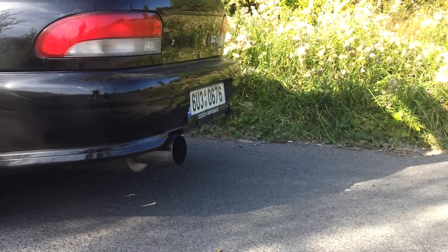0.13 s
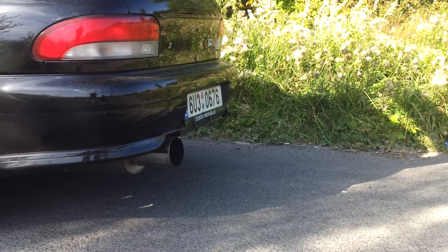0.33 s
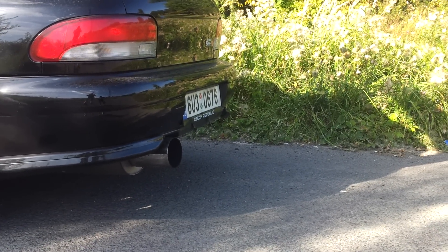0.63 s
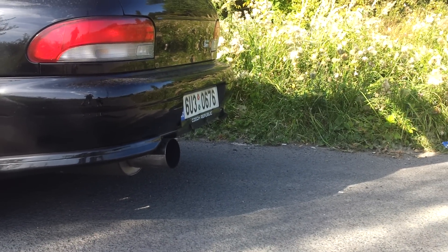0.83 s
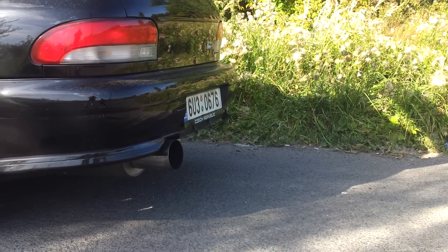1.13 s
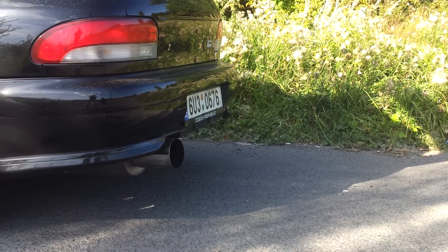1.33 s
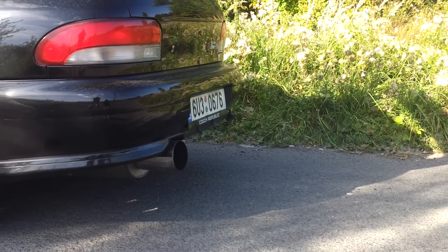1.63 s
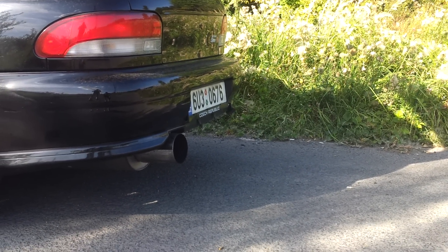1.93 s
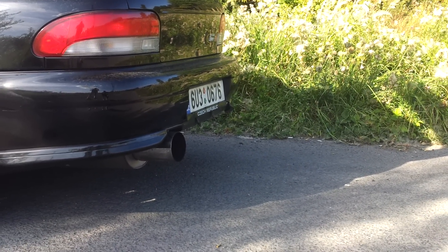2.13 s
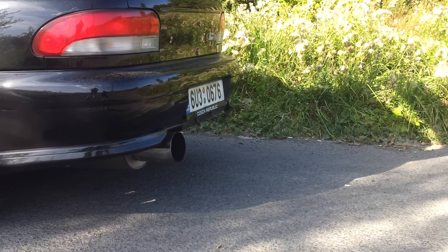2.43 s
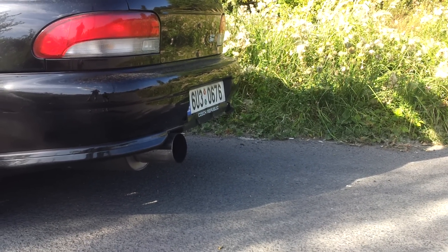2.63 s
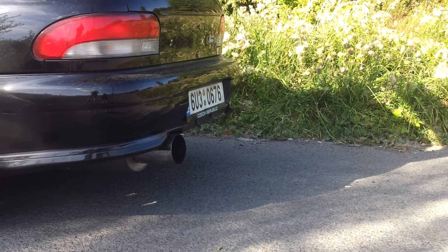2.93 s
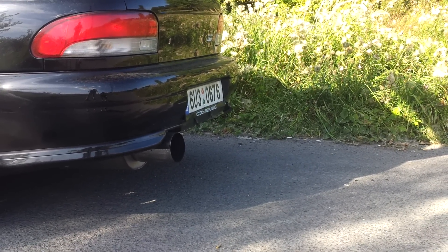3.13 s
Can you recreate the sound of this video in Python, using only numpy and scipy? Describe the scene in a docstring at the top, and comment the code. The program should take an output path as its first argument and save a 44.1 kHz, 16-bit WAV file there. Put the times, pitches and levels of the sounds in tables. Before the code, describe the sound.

A car engine heard close at the tailpipe outdoors: a loud bassy rev with airy hiss slides down in pitch, then settles into a soft, lumpy idle with faint falling turbo whistles; the loudest bass overloads the microphone.

```python
"""Flat-four coasting down to idle

A flat-four car engine falls from a rev to a lumpy idle, microphone beside the tailpipe on an open road.
Firing pulses ring the exhaust; its two banks arrive unalike, so the note burbles once a cycle. Gas noise
roars and hisses through pipe resonances, and turbocharger whistles made of gliding sines slowly fall.
A faint hum and brief swells of a narrow tone lie beneath. The loud bass overloads the microphone."""
import sys
import numpy as np
from scipy import signal
from scipy.fft import rfft, irfft, next_fast_len
from scipy.io import wavfile
from scipy.ndimage import uniform_filter1d

SR = 44100
rng = np.random.default_rng(int(sys.argv[2]) if len(sys.argv) > 2 else 0)


def materialize(psi):
    """Save the field psi as 16-bit PCM at rate SR to the path in sys.argv[1].

    A 1-D psi becomes a single channel; in a 2-D psi each row is a channel.
    """
    bounded = np.clip(np.atleast_2d(psi).T, -1, 1)
    quanta = np.round(bounded * 32767).astype(np.int16)
    wavfile.write(sys.argv[1], SR, quanta)


N = 145530  # samples

# Engine speed: t/s, firing rate/(1/s)
FIRING_RATE = [(0, 97.7), (.2, 89.6), (.4, 80.7), (.6, 72.75), (.8, 64.8), (1, 56.7), (1.2, 48.85),
               (1.35, 43.4), (1.5, 37), (1.6, 36.2), (1.75, 35.4), (1.9, 34.3), (2.1, 33.4), (2.4, 33.6),
               (2.7, 32.8), (3, 31.4), (3.3, 29.2)]
# Strength of the sources: t/s, exhaust pulse level/dB, hiss level/dB, roar level/dB (all relative)
SOURCE_LEVELS = [(0, 0, -23, -22.5), (.21, -0.5, -24, -24.5), (.38, -3, -25.5, -25),
                 (.58, -5.5, -26.5, -29.5), (.74, -6, -28.5, -32), (1.01, -9, -29, -32.5),
                 (1.21, -12.5, -30, -34), (1.39, -16.5, -31, -40), (1.5, -18.5, -33, -42),
                 (1.6, -24, -34.5, -44), (1.75, -20.5, -35, -44), (2.0, -17.5, -35.5, -45),
                 (2.2, -18.5, -36.5, -44), (2.55, -17.5, -36, -45), (2.98, -19, -36.5, -46),
                 (3.3, -21, -36, -47.5)]
# Exhaust response to what all cylinders share: f/Hz, gain/dB
SHARED_RESPONSE = [(8, -74.5), (30, -10.5), (42, 2), (52, 6), (62, 4), (75, -1), (90, -4.5), (105, -10),
                   (125, -19.5), (145, -15), (170, -26), (200, -17.5), (240, -32.5), (280, -26.5),
                   (330, -50), (400, -58), (447, -43), (510, -52.5), (588, -40), (680, -57.5), (1500, -130)]
# Response to the bank burble partials just below each firing harmonic: f/Hz, gain/dB
BANKS_BELOW = [(8, -58), (15, -46), (30, -55), (45, -29), (60, -14.5), (75, -15.5), (92, -13), (110, -19),
               (135, -14.5), (155, -17), (175, -31.5), (205, -22), (240, -41.5), (285, -33), (340, -48),
               (500, -57.5), (1500, -130)]
# Response to the bank burble partials just above each firing harmonic: f/Hz, gain/dB
BANKS_ABOVE = [(8, -26), (15, -31), (30, -42), (43, -38), (55, -31), (66, -11), (76, -33.5), (92, -12.5),
               (110, -25.5), (135, -17.5), (155, -20), (180, -31.5), (205, -25), (240, -43.5), (285, -34),
               (340, -50.5), (500, -49), (1500, -130)]
# Response to the difference between neighbouring firings: f/Hz, gain/dB
NEIGHBOUR_RESPONSE = [(8, -99), (15, -57), (40, -41), (60, -8), (100, -28), (150, -31.5), (205, -30),
                      (240, -44.5), (280, -30), (330, -63), (500, -70), (1500, -130)]
# Unevenness between neighbouring firings: t/s, gain/dB
NEIGHBOUR_GAIN = [(0, 6.5), (.25, -11), (.45, 2), (.7, -1), (1.0, -8), (1.4, -14), (1.6, 10), (1.9, 1),
                  (2.3, -19.5), (3.3, 8)]
# Bank burble: t/s, gain/dB, lag of the upper partials/rad
BURBLE = [(0, 1.5, 1.6), (1.1, 0.5, 1.3), (1.45, 3.5, 0.31), (1.6, 4, 0.81), (1.9, 3, -0.09),
          (2.5, 0.5, 0.3), (3.3, 2.5, 0.62)]
# Roar spectrum, relative: f/Hz, density/(dB per Hz)
ROAR_SPECTRUM = [(180, -39), (300, 2), (360, -2.5), (430, 1), (500, -3.5), (590, 1.5), (768, -8),
                 (1060, -6), (1200, -18), (2500, -17.5), (3250, -49.5), (5500, -120)]
# Hiss spectrum towards idle, relative: f/Hz, density/(dB per Hz)
IDLE_HISS_SPECTRUM = [(410, -57), (700, -3.5), (826, -15), (886, -4), (1080, -4.5), (1190, -8.5),
                      (1930, -10), (3480, -8.5), (5070, -3.5), (6970, -2.5), (8510, -7), (10000, -14.5),
                      (11700, -26.5), (15200, -79), (22000, -120)]
# Hiss spectrum at high engine speed, relative: f/Hz, density/(dB per Hz)
FAST_HISS_SPECTRUM = [(880, -21), (1500, -3), (1620, -13), (2130, -18), (2650, -7), (3830, 1), (6140, 0.5),
                      (6870, 3.5), (8300, -3.5), (11700, -20.5), (15200, -55), (22000, -120)]
# Resonances in the roar: f/Hz, width/Hz, relative gain/dB
ROAR_RINGS = [(584, 9.6, -5.5), (1062, 20, -13), (445, 14, -9)]
# Pipe resonances met by hiss and whistles: f/Hz, width/Hz, relative gain/dB
PIPE_RINGS = [(2180, 7.7, 1.5), (2333, 3.1, 0), (2507, 10, 3.5), (3270, 35, -21), (3740, 13, 6),
              (3975, 11.5, 3), (4377, 75, 4), (4814, 30, 4), (5185, 52, 0), (5530, 32, 6), (6180, 140, -13),
              (6680, 92, -7.5), (7660, 33, -2.5), (8200, 50, -9), (8660, 40, -5.5)]
# Turbocharger reference pitch: t/s, f/Hz
TURBO_PITCH = [(0, 4600), (1.2, 3050), (1.55, 2840), (1.8, 2710), (2.15, 2500), (2.55, 2280), (2.9, 2110),
               (3.3, 1940)]
# Turbocharger strength, relative: t/s, level/dB
TURBO_LEVEL = [(0, -52), (1.0, -45), (1.2, -36), (1.4, -45.5), (1.5, -36), (1.7, -39), (1.9, -42),
               (2.2, -39), (2.55, -39.5), (2.7, -51.5), (2.9, -40.5), (3.1, -48), (3.3, -45)]
# Separate whistles: multiple of the reference pitch, relative level/dB
WHISTLES = [(0.914, -13.5), (1.0, -7.5), (1.29, -15), (1.47, -14), (1.86, -11.5), (1.9, -5.5),
            (1.969, -4.5), (2.36, -11), (2.448, -6), (2.84, -6), (2.93, -9.5), (3.35, -10.5)]
# Swells of the narrow tone: middle t/s, half length/s, peak level/dB
RING_SWELLS = [(.18, 0.041, -30.5), (1.332, 0.031, -37.5), (3.21, 0.071, -44.5)]

START_TURN = .365  # place in the four-firing cycle at 0 s, in cycles
JITTER, SCATTER_DB = .002, .3  # random spread of firing time (in firings) and of strength (dB)
BANK_LAG_S = 0.0029  # extra delay of the bank burble
FAST_RATE, IDLE_RATE = 92.6, 37  # firings per s between which the hiss changes character
PUFF_DB, PUFF_TURN = -0.5, 0.74  # hiss swing per firing; negative, so weakest at this turn (firings)
CHUFF_DB, CHUFF_TURN = 0.5, 0.77  # swing of the fast hiss per cycle, strongest at this turn (cycles)
FLICKER_DB = -0.08  # slow random wander of roar and idle hiss
IDLE_RINGS_DB, WHISTLE_RINGS_DB, DIRECT_DB = 1.5, 5.0, -2  # gain through the pipe rings, and past them
WAVER, PATCHY_DB = .006, 3.8  # random spread of whistle pitch (fraction) and level (dB)
HUM_HZ, HUM_DB = 825, -48.5
RING_HZ, RING_WIDTH_HZ = 1062, 25
CEILING, KNEE = 0.76, 4.2  # microphone overload: full-scale fraction, and sharpness of the bend
TOP_HZ = 11850


def undb(db):
    """Decibels to gain."""
    return 10 ** (np.asarray(db) / 20)


def unit(x):
    """Scale to rms 1."""
    return x / np.sqrt(np.mean(x ** 2))


def curve(table, column=1):
    """One column of a time table, sample by sample."""
    rows = np.array(table, float)
    return np.interp(np.arange(N) / SR, rows[:, 0], rows[:, column])


def colour(x, table):
    """Causal minimum-phase filter whose gain follows (f/Hz, gain/dB) points on a log frequency axis."""
    size = next_fast_len(N + SR // 2, True) // 2 * 2
    rows = np.array(table, float)
    hz = np.maximum(np.arange(size // 2 + 1) * SR / size, 1)
    gain = undb(np.interp(np.log(hz), np.log(rows[:, 0]), rows[:, 1]))
    # folding the cepstrum forward in time gives the minimum phase
    cepstrum = irfft(np.log(gain), size)
    cepstrum[1:size // 2] *= 2
    cepstrum[size // 2 + 1:] = 0
    response = np.exp(rfft(cepstrum))
    return irfft(rfft(x, size) * response, size)[:len(x)]


def rings(x, table):
    """Sum of parallel resonances, each with its gain in dB at its centre."""
    return sum(undb(db) * signal.lfilter(*signal.iirpeak(hz, hz / width, SR), x) for hz, width, db in table)


def walk(rate):
    """Random levels held 1 / rate s and smoothed twice; spread near 1."""
    hold = int(SR / rate)
    steps = np.repeat(rng.standard_normal(N // hold + 1), hold)
    smooth = uniform_filter1d(uniform_filter1d(steps, hold), hold)
    return unit(smooth[:N])


def exhaust(firings, rate):
    """One pulse a firing; bank and neighbour differences take their own paths through the pipes."""
    lead = SR // 10  # the engine already runs before 0 s
    before = firings[0] - rate[0] / SR * np.arange(lead, 0, -1)
    count = np.r_[before, firings]
    index = np.arange(np.ceil(count[0]), count[-1]).astype(int)
    time_chance, level_chance = rng.standard_normal((len(index), 2)).T
    at = np.interp(index + JITTER * time_chance, count, np.arange(N + lead)).astype(int)
    now = np.maximum(at - lead, 0)
    strength = undb(curve(SOURCE_LEVELS)[now] + SCATTER_DB * level_chance)
    size = strength * SR / rate[now] / np.sqrt(2)  # pulse area follows the firing interval

    def path(table, weight, lag_s=0):
        """Weighted pulses through one exhaust response, delayed by lag_s."""
        pulses = np.zeros(N + lead)
        pulses[at] = -size * weight
        return colour(pulses, table)[lead - int(lag_s * SR):][:N]

    def burble(table, side, lag=0):
        """Bank difference, keeping the partials on one side of each firing harmonic."""
        # two patterns a firing apart, one turned a quarter wave, cancel the other side
        turn = np.pi / 2 * index - np.pi / 4 - lag
        gain = undb(curve(BURBLE)[now])
        now_bank = path(table, gain * np.cos(turn), BANK_LAG_S)
        next_bank = path(table, gain * -np.sin(turn), BANK_LAG_S)
        padded = np.pad(next_bank, lead, "reflect")
        quarter_turned = signal.hilbert(padded).imag[lead:-lead]
        return now_bank + side * quarter_turned

    below, above = -1, 1
    shared = path(SHARED_RESPONSE, 0.91)
    lower = burble(BANKS_BELOW, below)
    upper = burble(BANKS_ABOVE, above, curve(BURBLE, column=2)[now])
    neighbours = path(NEIGHBOUR_RESPONSE, (-1.) ** index * undb(curve(NEIGHBOUR_GAIN)[now]))
    return shared + lower + upper + neighbours


def gas(firings, rate):
    """Resonant noise roars; hiss pulses with each firing and at speed also chuffs once a cycle."""
    fast = np.clip((rate - IDLE_RATE) / (FAST_RATE - IDLE_RATE), 0, 1)
    puff = PUFF_DB * np.cos(2 * np.pi * (firings - PUFF_TURN))
    chuff = CHUFF_DB * fast * np.cos(2 * np.pi * (firings / 4 - CHUFF_TURN))

    broad_roar = unit(colour(rng.standard_normal(N), ROAR_SPECTRUM))
    ringing_roar = unit(rings(rng.standard_normal(N), ROAR_RINGS))
    roar = broad_roar + ringing_roar * undb(-7)

    idle = colour(rng.standard_normal(N), IDLE_HISS_SPECTRUM)
    idle = unit(idle + undb(IDLE_RINGS_DB) * rings(idle, PIPE_RINGS))
    idle = idle * undb(FLICKER_DB * walk(9.35) + 0.77 * walk(150))
    rush = unit(colour(rng.standard_normal(N), FAST_HISS_SPECTRUM))
    rush = rush * undb(chuff + 0.46 * walk(20.7) + 1.1 * walk(200))
    hiss = idle * np.sqrt(1 - fast) + rush * np.sqrt(fast)  # equal-power blend

    roar_gain = undb(curve(SOURCE_LEVELS, column=3) + FLICKER_DB * walk(13.7))
    hiss_gain = undb(curve(SOURCE_LEVELS, column=2) + puff)
    return roar * roar_gain + hiss * hiss_gain


def turbo():
    """Falling turbocharger whistles that waver and flare where they cross a pipe resonance."""
    reference_hz = curve(TURBO_PITCH)
    tones = np.zeros(N)
    for multiple, db in WHISTLES:
        gain = undb(db + PATCHY_DB * walk(25.37))
        hz = multiple * reference_hz * (1 + WAVER * walk(120))
        tones += gain * np.sin(2 * np.pi * np.cumsum(hz) / SR)
    tones *= undb(curve(TURBO_LEVEL))
    return undb(DIRECT_DB) * tones + undb(WHISTLE_RINGS_DB) * rings(tones, PIPE_RINGS)


def hum():
    """A faint sine of steady pitch that wavers in level by about 1 dB."""
    return undb(HUM_DB + walk(24.96)) * np.sin(2 * np.pi * HUM_HZ * np.arange(N) / SR)


def ring():
    """Noise through one narrow resonance near 1 kHz swells briefly now and then."""
    t = np.arange(N) / SR
    swell = sum(undb(db) * np.exp(-((t - middle) / half) ** 2) for middle, half, db in RING_SWELLS)
    return swell * unit(rings(rng.standard_normal(N), [(RING_HZ, RING_WIDTH_HZ, 0)]))


def scene():
    """Exhaust, gas, turbocharger and faint tones at one microphone beside the tailpipe."""
    rate = curve(FIRING_RATE)
    firings = 4 * START_TURN + np.cumsum(rate) / SR
    return (exhaust(firings, rate) + gas(firings, rate) + turbo() + hum() + ring())[None]


def record(dry):
    """The microphone flattens the loudest swings towards its ceiling; a steep low-pass cuts the top."""
    flat = dry / (1 + np.abs(dry / CEILING) ** KNEE) ** (1 / KNEE)
    low_pass = signal.ellip(8, .2, 70, TOP_HZ, fs=SR, output="sos")
    return signal.sosfilt(low_pass, flat)


dry = scene()
out = record(dry)
materialize(out)
```